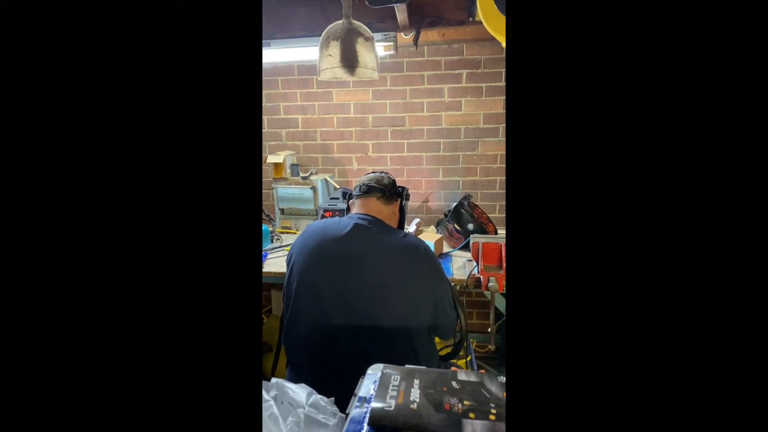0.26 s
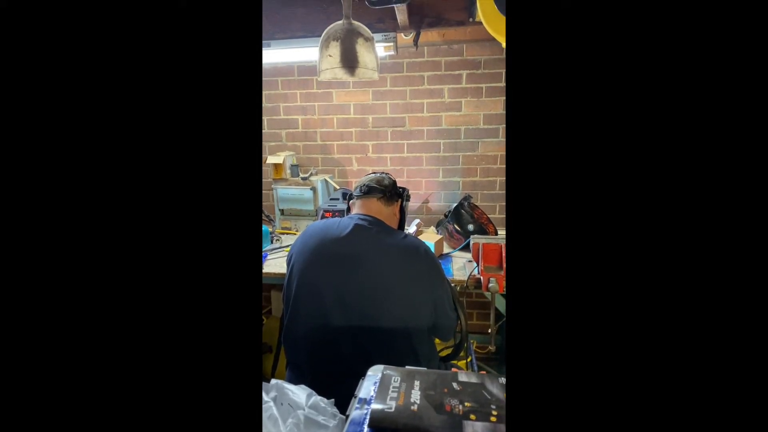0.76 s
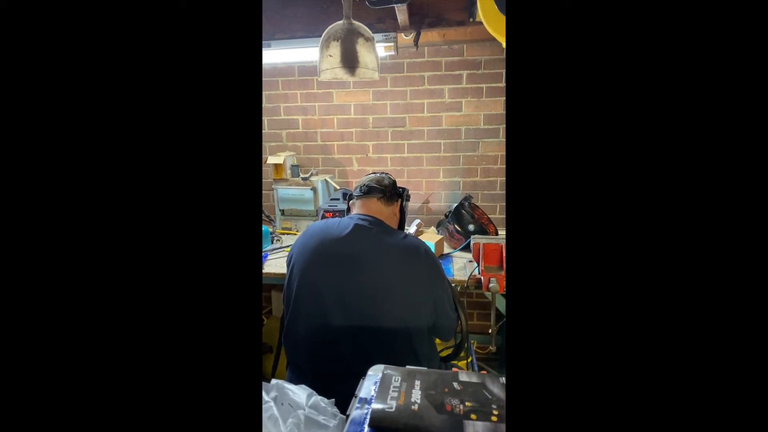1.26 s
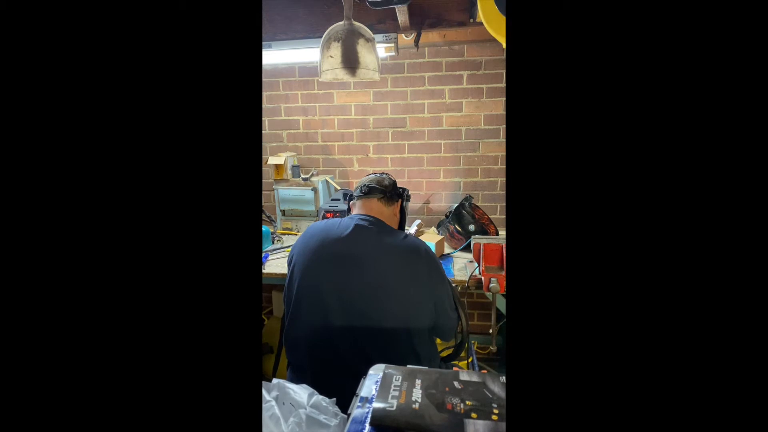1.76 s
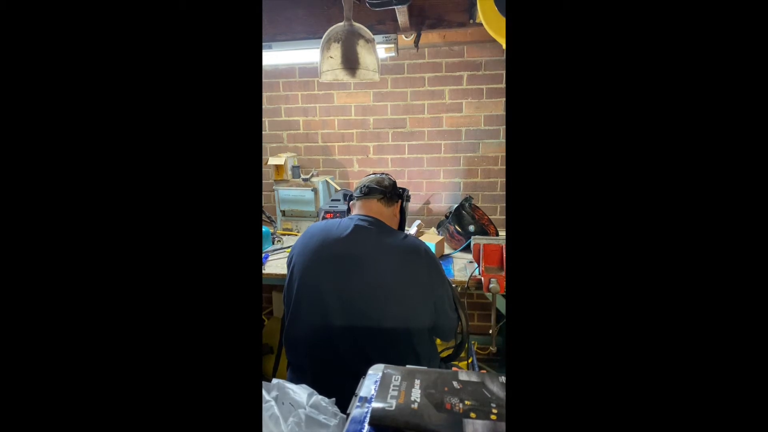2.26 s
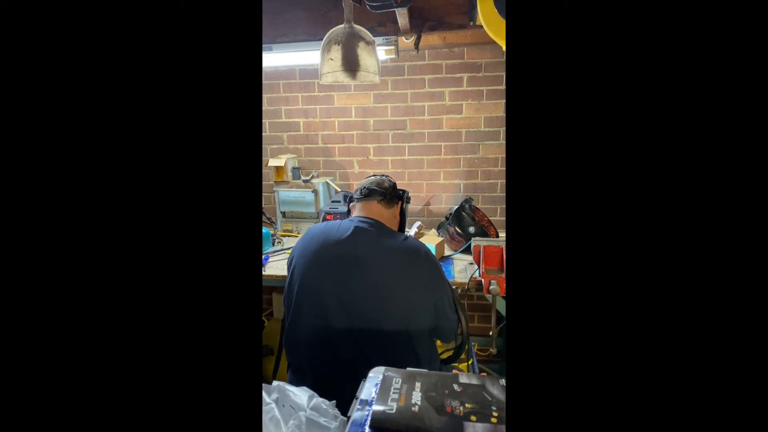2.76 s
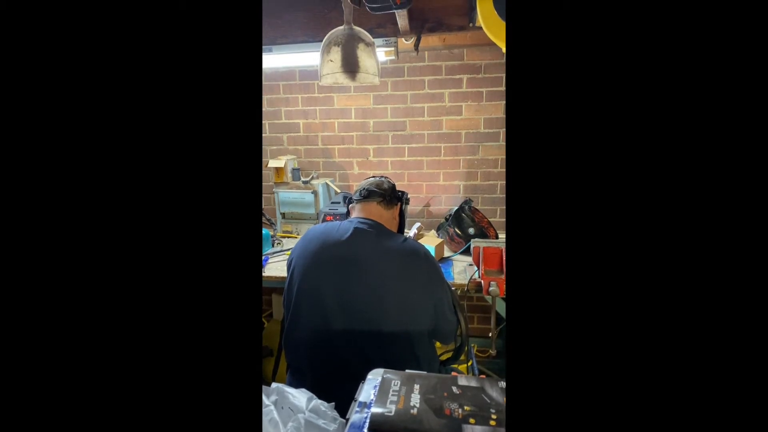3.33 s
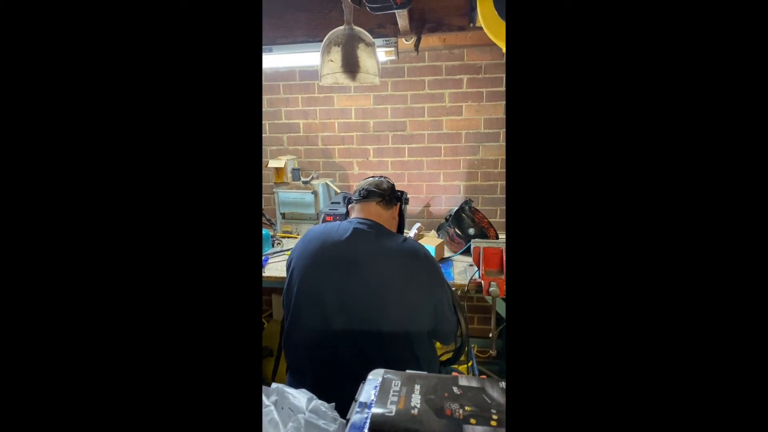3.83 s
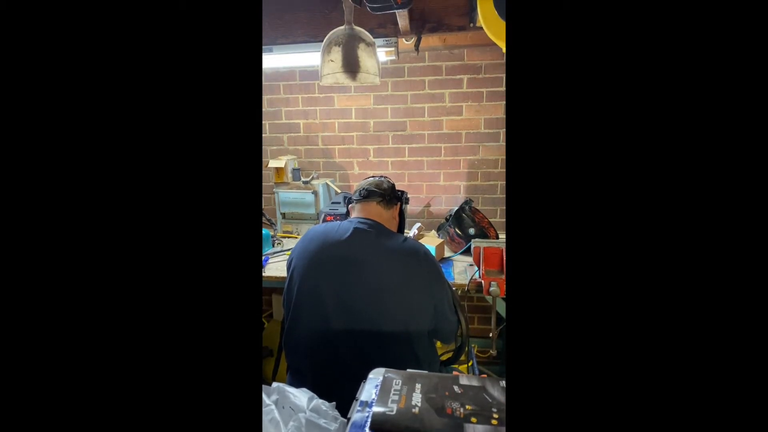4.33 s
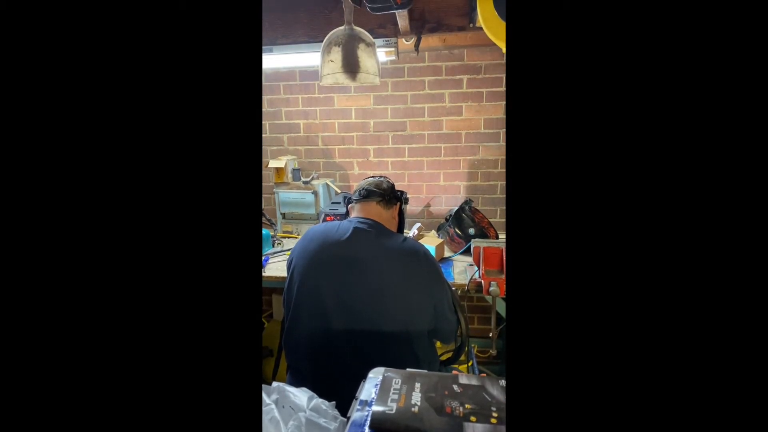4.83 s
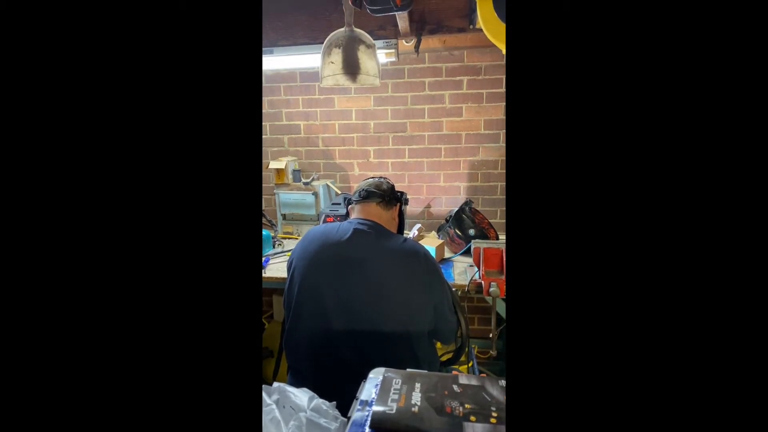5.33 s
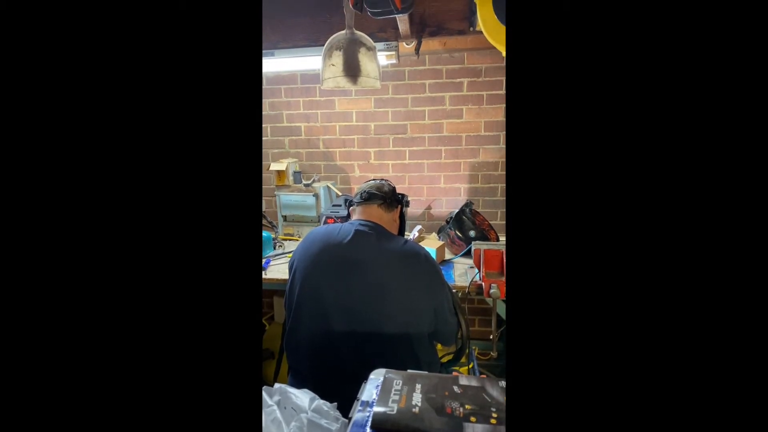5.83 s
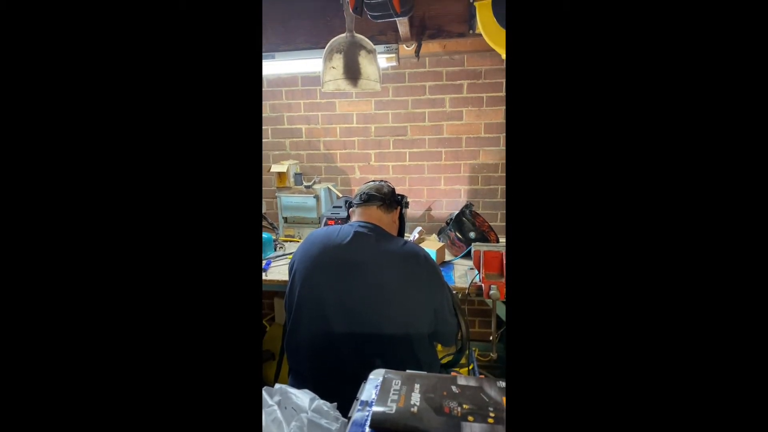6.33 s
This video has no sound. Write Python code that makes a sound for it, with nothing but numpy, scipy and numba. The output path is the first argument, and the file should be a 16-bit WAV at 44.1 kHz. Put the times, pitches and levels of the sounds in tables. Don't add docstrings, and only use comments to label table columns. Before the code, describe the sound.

A welding arc buzzes steadily and harshly in a brick garage, with fizzing crackle, brief sputters and a faint low traffic rumble near the end.

```python
import sys
import numpy as np
from scipy import signal
from scipy.fft import rfft, irfft
from scipy.io import wavfile
from scipy.ndimage import uniform_filter1d
from numba import njit

SR = 44100
rng = np.random.default_rng(int(sys.argv[2]) if len(sys.argv) > 2 else 0)


def generate_wav(signal):
    frames = np.transpose(np.atleast_2d(signal))
    scaled = np.clip(frames, -1, 1) * 32767
    pcm = np.round(scaled).astype(np.int16)
    wavfile.write(sys.argv[1], SR, pcm)


def invert_db(x):
    u = np.asarray(x, float) / 20
    return 10 ** u


N = 290619
CONTROL_SAMPLES = 441
LOW_HZ, TOP_HZ = 85, 15750
ARC_HZ = 90.132
ARC_MEAN_DB = -27.5

# (time [s], level [dB])
RUMBLE_LEVEL = [
    (0, -68),
    (2, -67),
    (4, -69),
    (5.5, -75),
    (5.8, -60),
    (6.3, -58),
    (6.59, -66),
]
# (frequency [Hz], density [dB per Hz])
RUMBLE_COLOUR = [(12, -41), (20, -11), (38, -8), (54, 15), (65, 3), (85, 13), (110, -47), (190, -120)]
# (frequency [Hz], left lead [rad], likeness of noise [0-1])
PORTS = [(100, 0, .9999), (400, -.1, .998), (900, -.5, .85), (1400, 0, .98), (2100, 0, .98),
         (2600, 2.8, .3), (3500, 1.1, .5), (4400, 1.6, .45), (5000, 3.4, .4), (5600, 6.5, .6),
         (7000, 7.2, .4), (9000, 8.3, .45), (11500, 8.8, .5), (13500, 9.3, .7)]
# (time [s], peak level [dB], brightness [dB])
SPUTTER_EVENTS = [(0.037, -28, -18), (0.23, -21.5, -14), (0.265, -21.5, -9), (0.747, -34, 10),
                  (1.909, -23, -4), (1.983, -23.5, -8), (2.356, -29, 8.5), (2.56, -32, 11),
                  (2.821, -28, 5.5), (2.93, -33.5, 11.5), (3.095, -31.5, 11), (3.655, -17, -10),
                  (3.738, -18.5, -17), (3.779, -21, -6), (3.795, -21, -12), (3.877, -19, -12),
                  (3.926, -28, 2), (3.956, -18.5, 0), (3.986, -20, -9), (4.028, -19.5, -6),
                  (4.089, -17.5, -15), (4.129, -35, 18), (4.555, -24.5, 0), (5.914, -35, -7),
                  (6.108, -25, -11), (6.15, -27, -14), (6.444, -28, -15), (6.483, -46, -11),
                  (6.555, -39, -5)]
# (frequency [Hz], level [dB])
SPUTTER_COLOUR = [(60, -38), (200, -23), (400, -5), (700, -6), (1100, -4.5), (2000, -6.5), (4000, -4),
                  (8000, -7), (15000, -9)]
# (frequency [Hz], density [dB per Hz])
FIZZ_COLOUR = [(135, -85), (225, -83), (400, -74), (500, -75), (760, -82), (1050, -74), (1300, -78),
               (1900, -77), (2400, -74), (3000, -74), (4500, -70), (7500, -74), (11000, -72), (15600, -76)]
# (time [s], heard arc level [dB], bench contact [dB], torch aim [dB])
TORCH = [(0, -24, -1, -3), (.42, -21, -4.5, -3.5), (.62, -26.5, -1.5, -9.5), (.9, -27.5, 1, -2.5),
         (1.47, -23, -5, -1.5), (1.58, -33.5, 0.5, 3), (1.96, -26, -4, 1), (2.08, -30.5, -1, -0.5),
         (2.26, -23, 1.5, 2.5), (2.75, -34, -1, -2), (3.3, -33.5, -1, -1), (3.56, -25, 1, 1.5),
         (4.1, -24, 0.5, -1), (4.72, -33, 1, 3), (5.03, -25.5, 3, 2), (6.2, -31, 2, 3),
         (6.41, -25.5, 2, -1), (6.59, -25, 2, -3.5)]
TORCH_BANDS_HZ = [900, 2800, 6200, 10000]
SHADE_SHARE = [0.075, 0.92, 0.9, 0.47]
CONTACT_SHARE = [1.0, .01, 0.43, -.3]
AIM_SHARE = [-0.4, 0.22, 0.87, 0.42]
# (level [dB], left minus right [dB], left lead [rad])
LOW_LINES = [(-63, 0, -0.0), (-51, 0, -0.1), (-64, -1, 0.1), (-52, 1, -0.1), (-43, 2, -0.1), (-55, -1, 0.1),
             (-51, -1, -1.0), (-57, 10, -1.8), (-45, -3, 0.3), (-49, 0, 0.6), (-42, 2, -0.9),
             (-44, 4, -0.8), (-50, -4, 0.4), (-46, 1, -0.8), (-50, -1, -0.1), (-50, -4, 0.1),
             (-47, 0, -0.1), (-62, 2, -0.1), (-51, 4, 0.7), (-39, 0, 0.0), (-63, 0, 0.0), (-44, 0, -0.0),
             (-53, 0, -0.1), (-54, 1, -0.0), (-49, 1, 0.2), (-37, 2, 0.8), (-51, 2, 2.4), (-44, 3, -0.7),
             (-48, -1, 2.6), (-47, 7, 2.5), (-44, -1, 2.8), (-48, -3, 3.0), (-51, 3, 2.2), (-46, -7, 2.6),
             (-52, -7, 1.4), (-45, -2, 1.6)]
# (frequency [Hz], level [dB], left minus right [dB], left lead [rad])
HIGH_LINES = [(3335, -46, -1, 1.6), (3605, -42, 2, 1.4), (3876, -44, -3, 1.2), (4236, -46, -2, 0.5),
              (4507, -47, 5, 2.5), (4867, -45, -9, -2.9), (5138, -44, -5, -1.4), (5228, -45, 1, -0.5),
              (5408, -45, -2, 1.0), (5498, -45, 6, -0.2), (5678, -47, 5, 1.3), (5768, -43, 0, 0.5),
              (5949, -47, 0, 0.8), (6490, -39, -1, 0.9), (6580, -43, 0, 0.9), (6760, -46, -1, 1.0),
              (8653, -45, 0, 1.8), (8833, -44, 0, 1.8), (8923, -45, 0, 1.8), (9103, -40, 0, 1.9),
              (9193, -45, 1, 1.8), (9374, -45, 0, 1.9), (9644, -47, 0, 2.1), (9915, -47, 0, 2.0),
              (10005, -47, 0, 2.1), (10996, -43, 0, 2.3), (11266, -43, 0, 2.5), (11447, -43, 0, 2.5),
              (12258, -43, 0, 2.9), (12348, -43, 0, 2.9)]
# (frequency [Hz], mean level [dB])
OTHER_LINES = [(3300, -56), (4200, -50), (5300, -51), (6300, -53), (7500, -52), (9000, -53), (10500, -47),
               (12000, -49), (14000, -48), (15600, -50)]
# (frequency [Hz], spread [dB])
WANDER = [(200, 0.76), (1000, 1.34), (2100, 1.0), (5000, 0.97), (12000, 2.0)]


def on_log(table, hz, column=1):
    table = np.array(table, float)
    return np.interp(np.log(hz + 1), np.log(table[:, 0]), table[:, column])


def on_time(table, s):
    at_s, *columns = np.transpose(table)
    return np.array([np.interp(s, at_s, c) for c in columns])


def control_s():
    return np.arange(N // CONTROL_SAMPLES + 2) * CONTROL_SAMPLES / SR


def walk(rate_hz, count, size):
    k = max(int(SR / CONTROL_SAMPLES / rate_hz), 1)
    rows = rng.standard_normal((count, size))
    for _ in range(2):
        rows = uniform_filter1d(rows, k, axis=1)
    rows = rows - rows.mean(axis=1, keepdims=True)
    return rows / rows.std(axis=1, keepdims=True)


def at_ports(sound, echo, colour):
    hz = np.fft.rfftfreq(N, 1 / SR)
    half_lead = np.exp(.5j * on_log(PORTS, hz))
    like = np.clip(on_log(PORTS, hz, column=2), 0, 1)
    left = rfft(sound)
    right = like * left + np.sqrt(1 - like ** 2) * rfft(echo)
    return irfft(invert_db(on_log(colour, hz)) * np.array([left * half_lead, right / half_lead]), N)


def rumble():
    low = at_ports(*rng.standard_normal((2, N)), RUMBLE_COLOUR)
    return low / low.std() * invert_db(on_time(RUMBLE_LEVEL, np.arange(N) / SR)[0])


def garage(sound, t60_s=.2, early_db=7):
    tail = rng.standard_normal(N) * invert_db(-60 * np.arange(N) / SR / t60_s)
    tail[:SR // 200] *= invert_db(early_db)
    echoes = rfft(tail)
    echoes /= np.sqrt(uniform_filter1d(abs(echoes) ** 2, size=N * 250 // SR))
    hz = np.fft.rfftfreq(N, 1 / SR)
    return irfft(rfft(sound) * echoes / (1 + (LOW_HZ / (hz + 1)) ** 4), N)


def sputters(rise_s=0.002, fade_s=0.013, dull_db=-15, bright_db=-19):
    s = np.arange(N) / SR
    dull_power, bright_power = np.zeros((2, N))
    for at_s, peak_db, spray_db in SPUTTER_EVENTS:
        age_s = np.maximum(s - at_s, 0)
        shape = invert_db(peak_db + 26.5) * (1 - np.exp(-age_s / rise_s)) * np.exp(-age_s / fade_s)
        dull_power += shape ** 2
        bright_power += (shape * invert_db(spray_db)) ** 2
    noise = rng.standard_normal((2, 2, N))
    body = at_ports(*(noise[0] * np.sqrt(dull_power)), SPUTTER_COLOUR)
    spray_colour = [(f, db - FIZZ_COLOUR[10][1] - 20 * (f < 2000)) for f, db in FIZZ_COLOUR]
    spray = at_ports(*(noise[1] * np.sqrt(bright_power)), spray_colour)
    return invert_db(dull_db) * body + invert_db(bright_db) * spray


def flutter(rate_hz=24.0, drift_points=17, settle_s=2.7, settled_share=0.61):
    s = control_s()
    quick = walk(rate_hz, count=1, size=len(s))[0]
    quick = quick - uniform_filter1d(quick, size=drift_points)
    return quick / quick.std() * np.where(s < settle_s, 1, settled_share)


def cycle(slip_s=1.61, slip_turns=.091):
    s = np.arange(N) / SR
    return ARC_HZ * s + slip_turns * np.clip((s - slip_s) / .02, 0, 1)


def fizz(flicker, gate=0.64, flicker_db=0.6, fizz_db=1.0, arc_share=0.46, aim_share=0.28):
    phase = 2 * np.pi * cycle()
    pulse = 1 + gate * np.cos(phase) + .5 * gate * np.cos(2 * phase + 1)
    s = np.arange(N) / SR
    arc_db, _, aim_db = on_time(TORCH, s)
    swell_db = arc_share * (arc_db - ARC_MEAN_DB) + aim_share * aim_db
    swell_db += flicker_db * np.interp(s, control_s(), flicker)
    noise = rng.standard_normal((2, N)) * pulse * invert_db(swell_db)
    return invert_db(fizz_db) * np.sqrt(SR / 2) * at_ports(*noise, FIZZ_COLOUR)


def line_table(scatter_db, scatter_rad):
    hz = ARC_HZ * np.arange(1, TOP_HZ // ARC_HZ + 1)
    chance = rng.standard_normal((len(hz), 3))
    unlike = hz < 5600
    level_db = on_log(OTHER_LINES, hz) + scatter_db * np.clip(chance[:, 0], -2, 1)
    pan_db = 4.0 * unlike * chance[:, 1]
    lead_rad = on_log(PORTS, hz) + scatter_rad * unlike * chance[:, 2]
    table = np.c_[level_db, pan_db, lead_rad]
    table[:len(LOW_LINES)] = LOW_LINES
    for line_hz, *row in HIGH_LINES:
        table[round(line_hz / ARC_HZ) - 1] = row
    return hz, table.T


def line_swell_db(hz, flicker, flicker_db):
    arc_db, contact_db, aim_db = on_time(TORCH, control_s())
    bands = np.outer(SHADE_SHARE, arc_db - ARC_MEAN_DB)
    bands += np.outer(CONTACT_SHARE, contact_db) + np.outer(AIM_SHARE, aim_db)
    swell_db = np.array([np.interp(np.log(hz), np.log(TORCH_BANDS_HZ), b) for b in bands.T])
    swell_db += flicker_db * np.outer(flicker, np.clip(hz / 2500, 0, 1))
    return swell_db * np.clip(hz / 500, 0, 1)


def snap_phase(hz, scramble_rad, ring_turns=.12, ring_from_hz=4000):
    start = scramble_rad * (1 + hz / 3000) * rng.standard_normal(len(hz))
    points = 2 * len(hz)
    ring = rng.standard_normal(points) * np.exp(-np.arange(points) / (points * ring_turns))
    return np.where(hz > ring_from_hz, np.angle(rfft(ring)[1:]), start)


@njit
def comb(turns, left, right, step):
    out = np.zeros((2, len(turns)))
    for i in range(len(turns)):
        j, part = i // step, (i % step) / step
        one = np.exp(2j * np.pi * turns[i])
        z, a, b = one, 0., 0.
        for k in range(left.shape[1]):
            a += (z * (left[j, k] + part * (left[j + 1, k] - left[j, k]))).imag
            b += (z * (right[j, k] + part * (right[j + 1, k] - right[j, k]))).imag
            z *= one
        out[0, i], out[1, i] = a, b
    return out


def buzz(flicker, flicker_db=1.3, scramble_rad=1.035, buzz_db=-0.44):
    hz, (level_db, pan_db, lead_rad) = line_table(scatter_db=2.5, scatter_rad=0.31)
    swell_db = line_swell_db(hz, flicker, flicker_db)
    points = len(control_s())
    slow, quick, turn, skew = (walk(r, count=len(hz), size=points).T for r in (0.5, 7.7, 1.2, 1.5))
    wander_db = on_log(WANDER, hz)
    line_db = level_db + buzz_db + swell_db + wander_db * (slow + 0.59 * quick)
    phase_rad = snap_phase(hz, scramble_rad) + 0.25 * wander_db * turn
    size = np.sqrt(2) * invert_db(line_db) * np.exp(1j * phase_rad)
    tilt = invert_db(pan_db / 2) * np.exp(.5j * (lead_rad + 0.29 * wander_db * skew))
    even = np.sqrt((invert_db(pan_db) + invert_db(-pan_db)) / 2)
    return comb(cycle(), size * tilt / even, size / tilt / even, CONTROL_SAMPLES)


def scene():
    flicker = flutter()
    return rumble() + garage(sputters() + fizz(flicker)) + buzz(flicker)


def roll_off(x):
    return signal.sosfilt(signal.butter(12, 15750, fs=SR, output="sos"), x)


def record(dry, top_sum_db=-9):
    mid, side = (dry[0] + dry[1]) / 2, (dry[0] - dry[1]) / 2
    hz = np.fft.rfftfreq(N, 1 / SR)
    mid = irfft(rfft(mid) * invert_db(top_sum_db * np.clip((hz - 11700) / 1500, 0, 3)), N)
    return roll_off(np.array([mid + side, mid - side]))


dry = scene()
out = record(dry)
generate_wav(out)
```